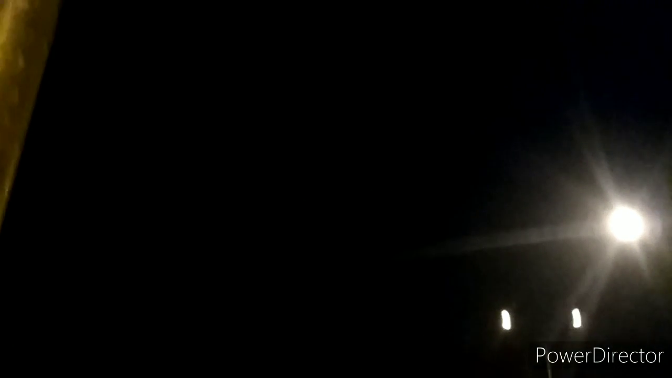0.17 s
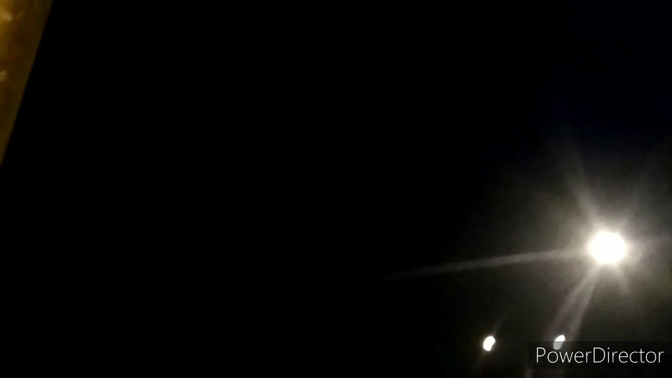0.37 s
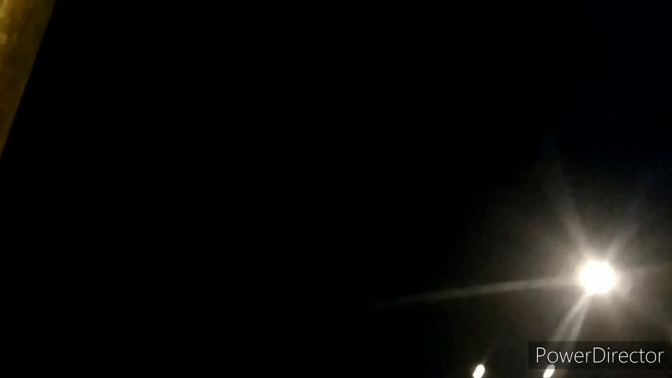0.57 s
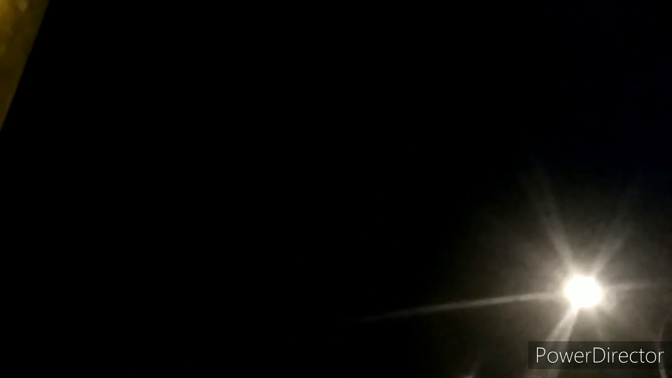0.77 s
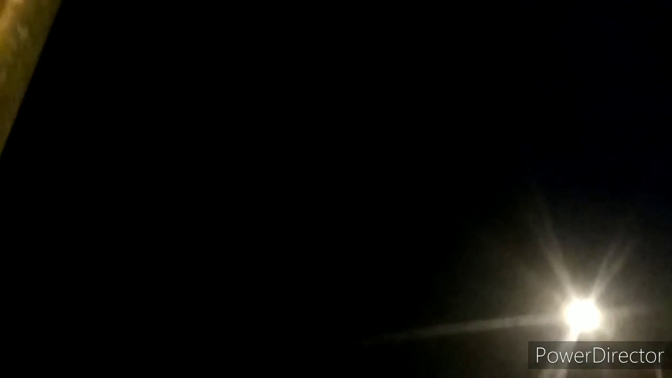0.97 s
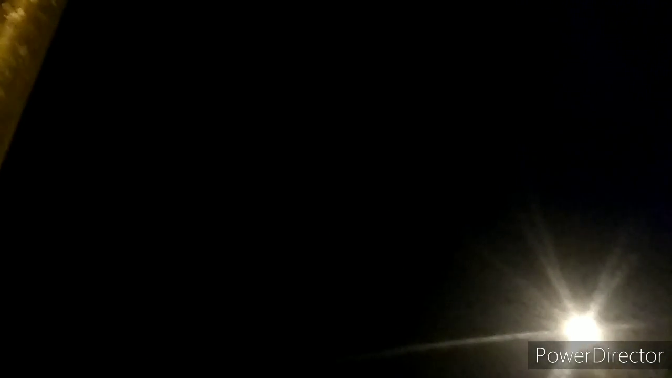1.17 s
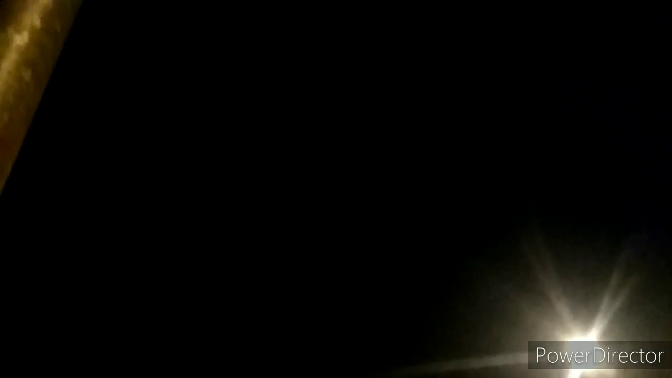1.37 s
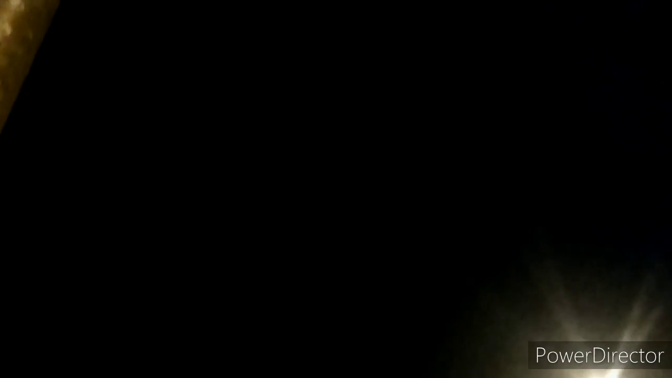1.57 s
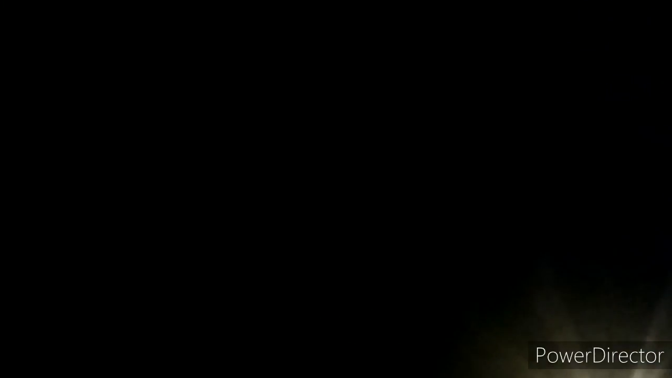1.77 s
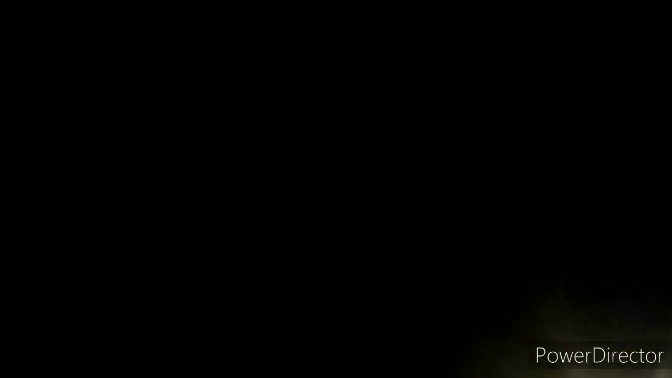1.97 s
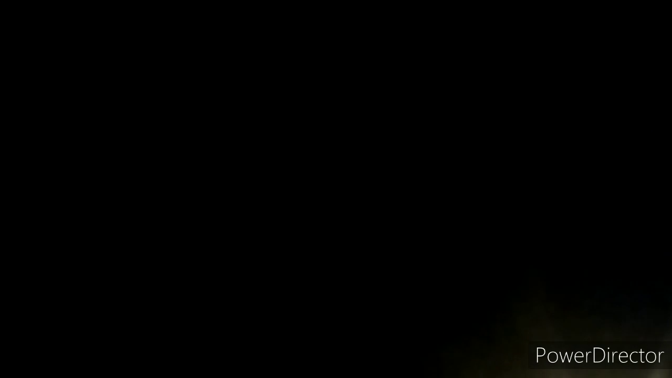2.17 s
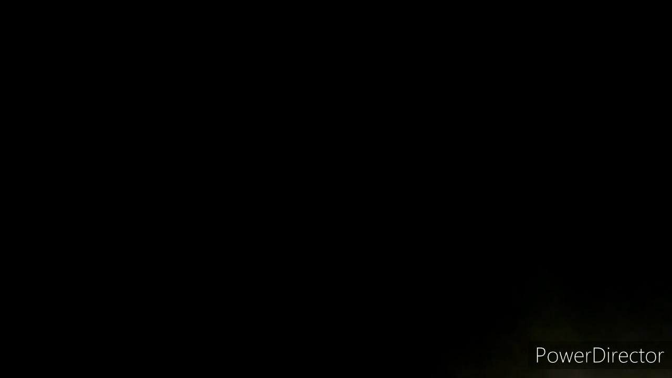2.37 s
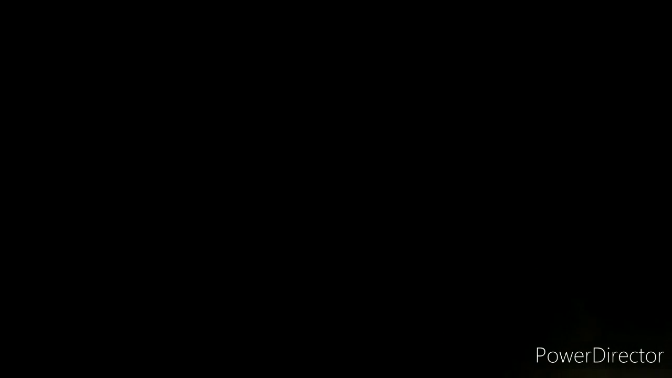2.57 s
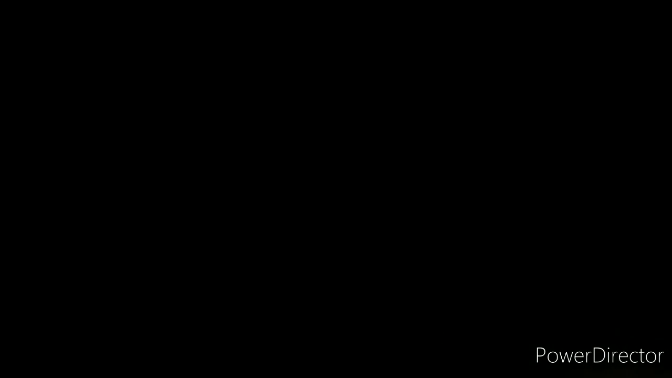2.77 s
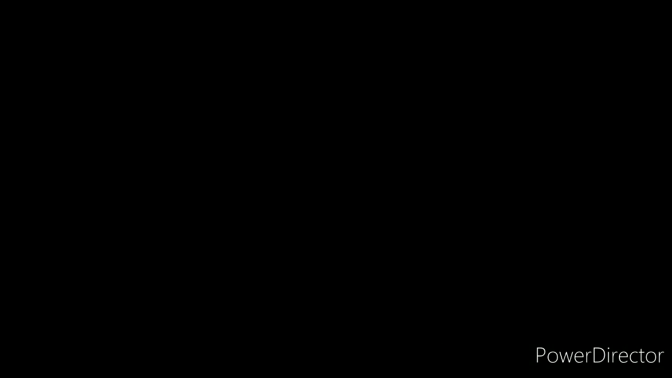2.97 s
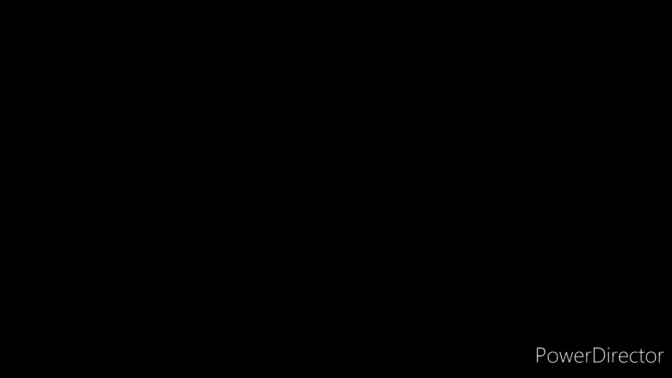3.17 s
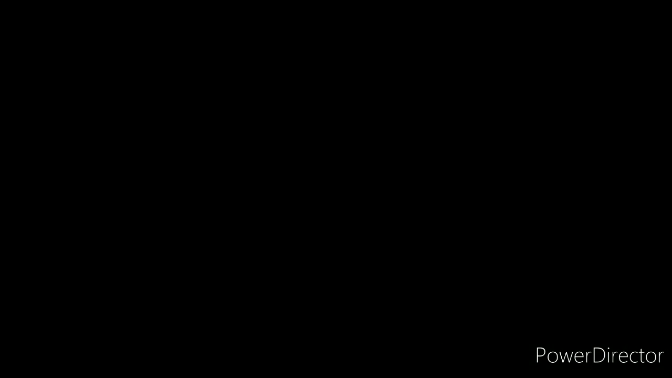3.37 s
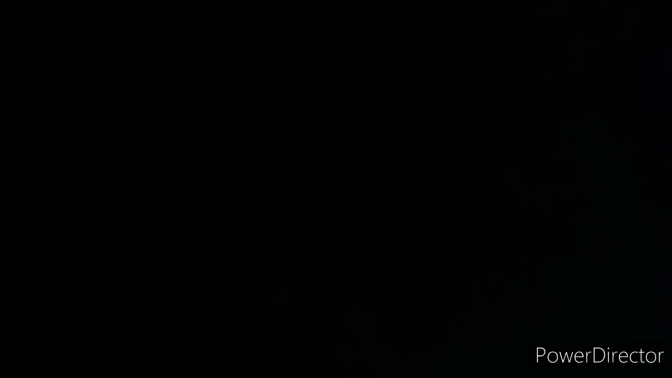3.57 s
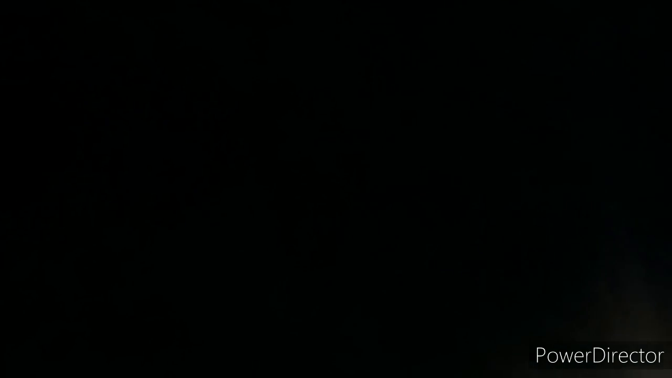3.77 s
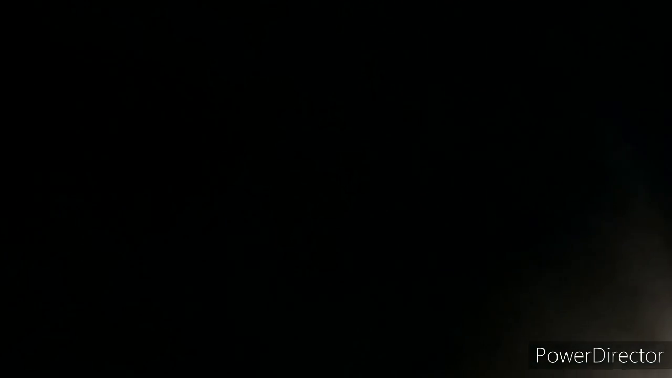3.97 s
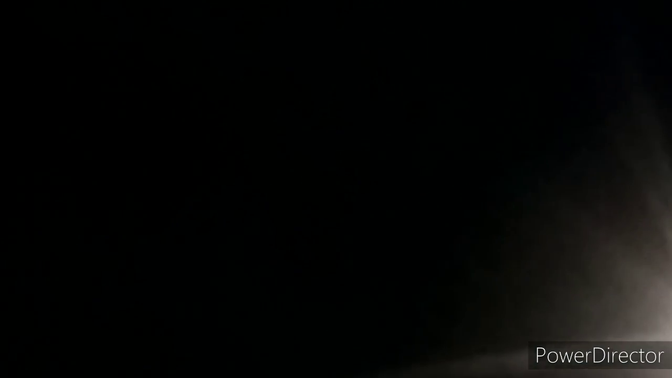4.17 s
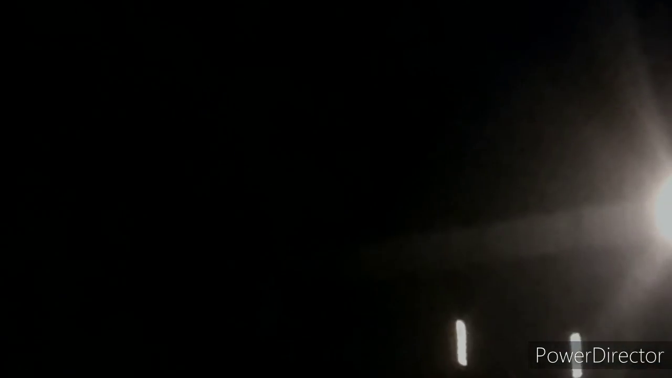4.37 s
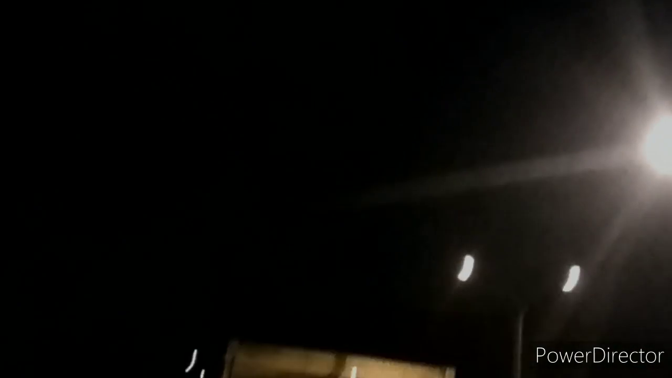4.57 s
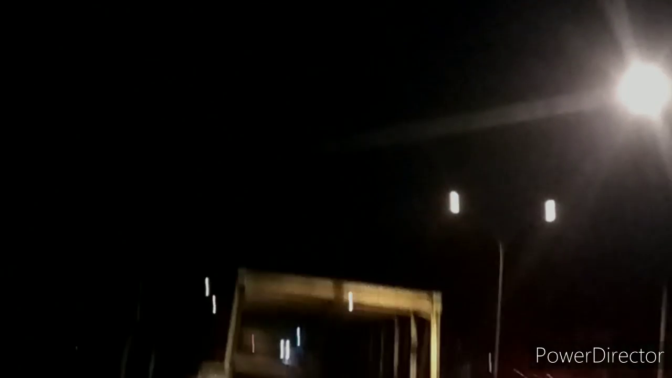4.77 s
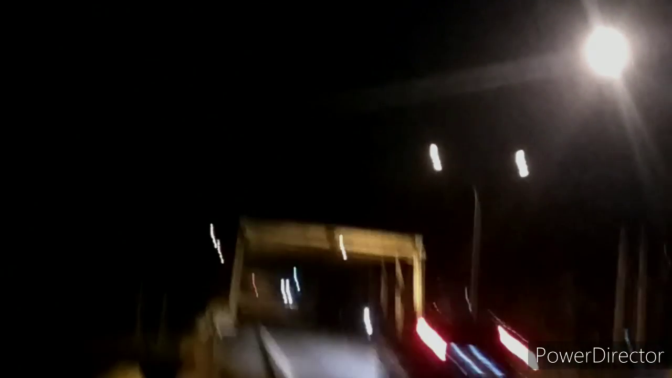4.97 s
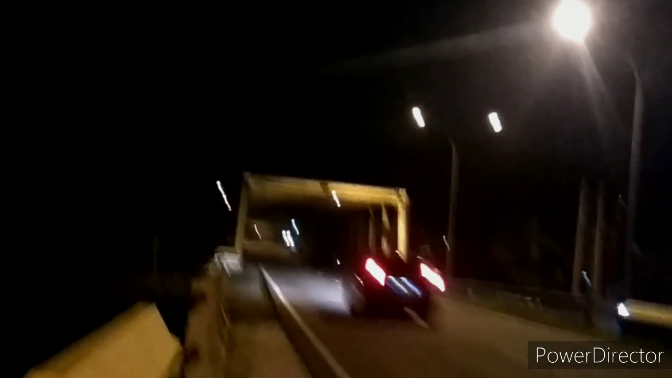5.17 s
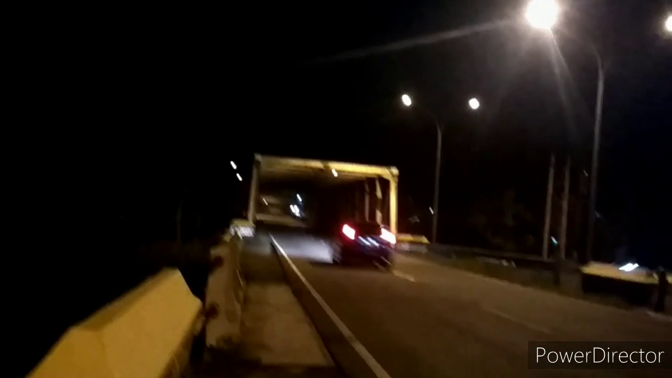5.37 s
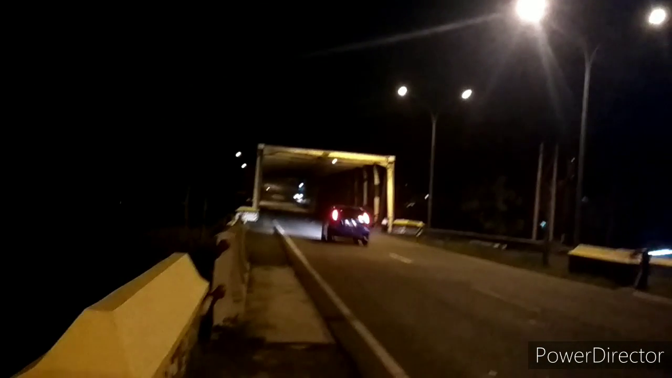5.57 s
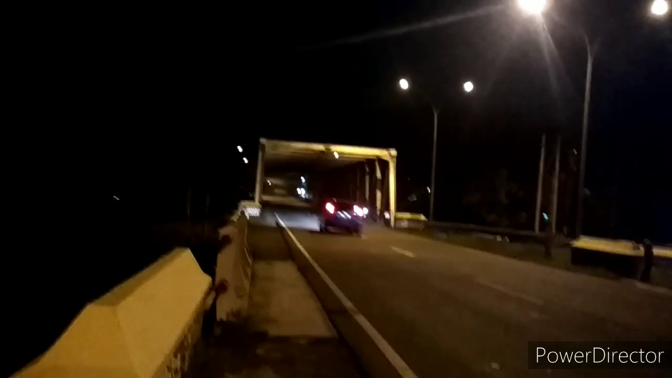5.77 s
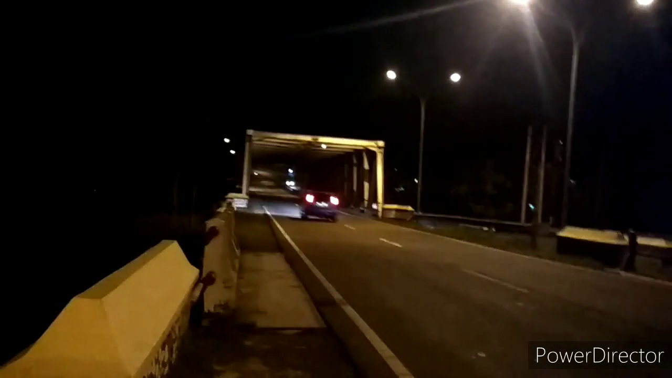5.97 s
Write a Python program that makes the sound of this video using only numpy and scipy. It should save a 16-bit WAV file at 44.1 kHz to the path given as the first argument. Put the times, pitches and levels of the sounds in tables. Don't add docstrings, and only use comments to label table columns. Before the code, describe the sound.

Close to a bridge road at night, a slow diesel lorry swells quickly, its deep throbbing exhaust peaking with airy hiss and a thin brake squeal. It drops away to a puff of air and sharp valve ticking. After a tiny silent gap, a car sweeps by with a humming engine and roaring tyres, slapping over joints, while a cricket chirps steadily. Handheld outdoor microphone, bassy, slightly rough and patchy in the treble.

```python
import sys
import numpy as np
from scipy import signal
from scipy.fft import rfft, irfft, next_fast_len
from scipy.io import wavfile
from scipy.ndimage import uniform_filter1d, map_coordinates

SR = 44100
rng = np.random.default_rng(int(sys.argv[2]) if len(sys.argv) > 2 else 0)


def convert_level_to_amplitude(level_db):
    exponent = np.asarray(level_db, float) / 20
    return 10 ** exponent


def pcm_store(signal):
    levels = np.round(np.clip(np.atleast_2d(signal), -1, 1) * 32767)
    wavfile.write(sys.argv[1], SR, levels.astype(np.int16).T)


N = 265923
TIME = np.arange(N) / SR

CUT = 3.524, 3.549
# strength/dB, lateness/s, valve tick/dB
CYLINDERS = [
    (0, 0, 0),
    (0, 0, -8),
    (-4, .002, -9),
]
# t/s, peak level/dB
TICKS = [(0, -53), (2.7, -45), (2.95, -24.5), (3.2, -19.5), (3.53, -18)]
NEAREST_DB = -19


def unit(x):
    return x / np.sqrt(np.mean(x ** 2) + 1e-20)


def along(points, hz):
    f, v = np.transpose(points)
    return np.interp(np.log(hz + 1), np.log(f + 1), v)


def curves(rows):
    s, *cols = np.transpose(rows)
    return [np.interp(TIME, s, c) for c in cols]


def wobble(rate):
    coarse = np.arange(0, N + 64, 64) / SR
    knots = rng.standard_normal(int(N * rate / SR) + 5)
    return np.interp(TIME, coarse, map_coordinates(knots, [coarse * rate]))


def filtered(x, response):
    m = next_fast_len(N + 8192)
    return irfft(rfft(x, m) * response(np.fft.rfftfreq(m, 1 / SR)), m)[..., :N]


def delayed(x, samples, order=3):
    return map_coordinates(x, [np.arange(N) - samples], order=order, mode="nearest")


def modes(table):
    def response(f):
        total = 0
        for k, (centre, width, db) in enumerate(table):
            damping = 1j * f * width
            total = total + (-1) ** k * convert_level_to_amplitude(db) * damping / (centre * centre - f * f + damping)
        return total
    return response


def rush(spectrum, patchy_db=None):
    pair = rng.standard_normal((2, N))
    if patchy_db is not None:
        z = signal.stft(pair, nperseg=512)[2]
        field = uniform_filter1d(rng.standard_normal(z.shape[1:]), size=7, axis=0)
        field = uniform_filter1d(field, size=10, axis=1)
        pair = signal.istft(z * convert_level_to_amplitude(patchy_db * unit(field)), nperseg=512)[1][:, :N]
    return unit(filtered(pair, lambda hz: convert_level_to_amplitude(along(spectrum, hz))))


def scattered(x):
    t = TIME[:SR // 8]
    tail = rng.standard_normal(len(t)) * convert_level_to_amplitude(-60 * t / 0.091)
    return np.array([x, signal.fftconvolve(x, tail / np.linalg.norm(tail))[:N]])


def passing(top_db, closest, coming, going):
    away = (TIME - closest) / np.where(TIME < closest, coming, going)
    return top_db - 10 * np.log10(1 + away ** 2)


def summed(*levels_db):
    return np.sqrt(sum(convert_level_to_amplitude(db) ** 2 for db in levels_db))


def firings(anchor, column_db, scatter_db):
    # t/s, firing rate/Hz
    lorry_rate = [(0.4, 33.2), (0.7, 32.7), (1.05, 31.9), (1.3, 30.9), (1.6, 29.95), (1.9, 29.4),
                  (2.2, 29.1), (2.9, 28.9), (3.53, 28.75)]
    turns = np.cumsum(curves(lorry_rate)[0]) / SR
    turns -= np.interp(anchor, TIME, turns)
    k = np.arange(np.ceil(turns[0]), turns[-1] - 1).astype(int)
    cylinder = k % len(CYLINDERS)
    luck = rng.standard_normal((len(k), 2))
    late = np.transpose(CYLINDERS)[1][cylinder] + .0003 * luck[:, 0]
    where = np.clip((np.interp(k, turns, TIME) + late) * SR, 0, N - 1).astype(int)
    return np.bincount(where, convert_level_to_amplitude(column_db[cylinder] + scatter_db * luck[:, 1]), N)


def lorry_engine():
    # t/s, level/dB
    tailpipe = [(0, -65), (.5, -50), (.7, -45), (.78, -30), (.88, -19.5), (1.18, -13.5), (1.5, -14.5),
                (1.78, -21), (1.9, -23), (1.945, -33), (1.99, -26), (2.07, -23), (2.2, -26.5), (2.4, -39.5),
                (2.48, -34), (2.65, -37), (3.1, -43), (3.53, -36.5)]
    # t/s, share
    rough = [(0, .8), (.75, .4), (1, .2), (1.45, .17), (1.75, .32), (2.05, .6), (2.7, 1.1), (3.53, 1.1)]
    # t/s, half length/s, level/dB
    surges = [
        (2.698, 0.0134, 9.5),
        (2.805, 0.026, 10),
        (3.112, 0.014, 5),
        (3.325, 0.0225, 5),
        (3.445, 0.025, 15),
        (3.497, 0.0093, 5),
    ]
    # f/Hz, width/Hz, level/dB
    thump = [
        (62, 30, -11),
        (108, 50, 0),
        (33, 18, -14),
    ]
    boom = [
        (158, 38, 0),
    ]
    body = [
        (192, 45, 0),
    ]
    bark = [
        (315, 80, 0),
    ]
    # over tailpipe/dB, steepness, near engine side/dB, near steepness, share of surge
    pipe_parts = [
        (-2, 1.14, -53, 0.145, .8),
        (.5, 0.99, -61.5, 0.15, 0.34),
        (-9, .85, -34.5, 0.43, 0.919),
        (-9.5, 1.57, -32, 0.823, .7),
    ]
    arrival = [
        -.003,
        .003,
        .005,
        0.0089,
    ]
    loudest_db, first_firing, first_tick = -15, 1.135, 3.213

    def pipe(table):
        ring = modes(table)
        return lambda hz: ring(hz) * np.abs(ring(hz))

    strength_db, _, tick_db = np.transpose(CYLINDERS)
    exhaust = np.zeros(N)
    tail_db = curves(tailpipe)[0] - loudest_db
    side_db = curves(TICKS)[0] - NEAREST_DB
    surge_db = sum(db * np.exp(-((TIME - s) / half) ** 2) for s, half, db in surges)
    for part, table, late in zip(pipe_parts, [thump, boom, body, bark], arrival):
        over_db, steep, near_db, grows, share = part
        gain = summed(loudest_db + over_db + steep * tail_db, near_db + grows * side_db)
        gain = gain * convert_level_to_amplitude(share * surge_db)
        puffs = unit(firings(first_firing + late, strength_db, scatter_db=2.0))
        puffs = puffs + curves(rough)[0] * rng.standard_normal(N)
        exhaust -= gain * unit(filtered(puffs, pipe(table)))
    exhaust = filtered(exhaust, lambda hz: 1 / (1 + (hz / 410) ** 14))
    t = TIME[:300]
    click = np.sin(2 * np.pi * 9100 * t) * convert_level_to_amplitude(-60 * t / 0.011)
    click = click * (1 + .9 * rng.standard_normal(len(t)))
    ticks = signal.fftconvolve(firings(first_tick, tick_db, scatter_db=2.5), click)[:N]
    return scattered(exhaust) + convert_level_to_amplitude(curves(TICKS)[0] + 3.5) * ticks * [[1], [-.3]]


def lorry_road():
    # far level/dB, top level/dB, closest/s, coming/s, going/s
    layers = [
        (-46, -31.5, 1.267, 0.173, 0.24),
        (-38, -28, 1.175, 0.096, 0.4),
        (-51, -37, 1.16, 0.24, 0.51),
        (-55, -26.5, 1.324, 0.28, 0.59),
    ]
    engine_side_db = [
        -34.5,
        -33.5,
        -52,
        -39,
    ]
    valve_puff_db = [
        -60,
        -50,
        -38,
        -26,
    ]
    # t/s, delay/ms, share
    ground = [(0, 1.88, 0.96), (1, 1.822, 0.17), (1.4, 1.87, 0.184), (2, 1.79, 0.25), (2.8, 1.69, 0.67),
              (3.53, 1.702, 0.87)]
    # f/Hz, level per Hz/dB
    casing_colour = [(430, -37.5), (560, -9.5), (680, -2), (950, -1.5), (1100, -3.5), (1300, -29.5)]
    tread_colour = [(950, -48), (1150, -8.5), (1350, -2.5), (2000, -4.5), (2900, -9.5), (3400, -16.5),
                    (3700, -29), (4200, -51)]
    whirr_colour = [(2240, -28), (3800, 9), (4380, 1.5), (5040, -1.5), (5540, 1.5), (6460, 1), (8200, -3),
                    (10700, -51), (18000, -120)]
    air_colour = [(4350, -29.5), (7400, -5), (8610, -5), (9770, -0.5), (13100, 2.5), (14900, -3),
                  (15600, 4.5), (16000, -42)]
    traffic_colour = [(12, -38), (28, -3.5), (64, 3.5), (203, -6), (340, -20), (392, -9.5), (471, -14.5),
                      (600, -17), (780, -17), (1320, -120)]
    puff_s, puff_rise_s, puff_fall_s = 2.64, .04, .1

    side_db = 0.63 * (curves(TICKS)[0] - NEAREST_DB)
    puff_db = -np.abs(TIME - puff_s) * 9 / np.where(TIME < puff_s, puff_rise_s, puff_fall_s)
    gains = []
    for (far_db, *pass_by), near_db, top_db in zip(layers, engine_side_db, valve_puff_db):
        gains.append(summed(far_db, passing(*pass_by), near_db + side_db, top_db + puff_db))
    casing, tread, fan, leak = gains
    delay_ms, share = curves(ground)
    gust = wobble(8.949)
    tyres = casing * rush(casing_colour, patchy_db=2.5) + tread * rush(tread_colour, patchy_db=1.0)
    echo = [delayed(uniform_filter1d(x, size=13), delay_ms * SR / 1000, order=1) for x in tyres]
    tyres = tyres - share * np.array(echo)
    whirr = fan * convert_level_to_amplitude(4.2 * gust) * rush(whirr_colour)
    flutter_db = 0.5 * wobble(5) + 0.9 * gust + 1.1 * wobble(18)
    air = leak * convert_level_to_amplitude(flutter_db) * rush(air_colour, patchy_db=1.5)
    return convert_level_to_amplitude(0.48 * gust) * tyres + whirr + air + convert_level_to_amplitude(-46.0) * rush(traffic_colour)


def brakes():
    # start/s, end/s, f/Hz, level/dB
    squeals = [
        (.86, 1.03, 3018, -38),
        (.88, 1.0, 3440, -55),
        (1.0, 1.18, 3018, -51),
        (.06, .27, 5620, -52),
        (.29, .36, 5620, -51),
    ]
    out = np.zeros(N)
    for start, end, hz, db in squeals:
        rise = np.clip((TIME - start) / 0.0071, 0, 1)
        fall = np.clip((end - TIME) / (0.51 * (end - start)), 0, 1)
        tone = np.sin(2 * np.pi * hz * TIME + 0.4 * wobble(41))
        out += convert_level_to_amplitude(db + 9 + 1.2 * wobble(29)) * rise * fall * tone
    return out * [[1], [-.7]]


def far_drone():
    swell_db = 3 * passing(0, closest=.6, coming=.07, going=.035)
    gain = summed(-32 + swell_db, -50) * (TIME < .75)
    hum = gain * convert_level_to_amplitude(2 * wobble(25)) * np.sin(2 * np.pi * 198 * TIME + .6 * wobble(30))
    return hum * [[1], [0]]


def car_engine():
    # t/s, firing rate/Hz
    car_rate = [(3.56, 64.2), (3.7, 60.5), (4.07, 61.1), (4.35, 59.4), (4.7, 59.3), (5.05, 59.2), (5.4, 60),
                (6.03, 58.56)]
    strong_orders = [2, 4, 5, 6]
    # top level/dB, loudest/s, coming/s, going/s
    order_passes = [
        (-22, 4.23, .25, 0.837),
        (-20, 4.13, 0.084, 0.128),
        (-25.5, 4.966, 0.46, 0.63),
        (-22, 4.56, .3, 0.32),
    ]
    # multiple of the firing rate, level against order 2/dB
    weak_orders = [(1, -8.5), (1.5, -5.5), (3, -1.5), (3.5, -8.5), (7, -10.5), (8, -12.5)]
    rate, = curves(car_rate)
    strong_db = [passing(*pass_by) for pass_by in order_passes]
    turn = 2 * np.pi * np.cumsum(rate) / SR
    out = np.zeros(N)
    for k, db in zip(strong_orders, strong_db):
        out += convert_level_to_amplitude(db + 2 + 1.8 * wobble(10)) * np.cos(k * turn + .4 * wobble(9))
    for k, db in weak_orders:
        out += convert_level_to_amplitude(strong_db[0] + db + 1.5 * wobble(6)) * np.cos(k * turn + 0.984 * wobble(6))
    return scattered(out)


def car_road():
    # top level/dB, loudest/s, coming/s, going/s
    passes = [
        (-19.5, 4.07, 0.39, 0.94),
        (-20.5, 4.32, 0.234, 0.27),
        (-19.5, 4.625, 0.42, 0.46),
        (-28, 4.437, 0.31, 0.49),
        (-29.5, 4.48, 0.16, .12),
    ]
    swells_db = [
        .8,
        .8,
        .5,
        .6,
    ]
    # f/Hz, level per Hz/dB
    rumble = [(8.8, -50), (15, -16.5), (112, -0.5), (183, -1), (226, -5), (296, -0.5), (401, -7),
              (560, -17), (730, -39), (1230, -120)]
    boom = [(380, -26), (460, -1), (700, -3), (950, -6), (1150, -41)]
    roar = [(530, -56), (900, -17), (1020, 0), (1210, 2), (1320, -1.5), (1610, -2.5), (2600, -18),
            (3380, -63), (5720, -120)]
    hiss = [(1240, -49.5), (2100, -5), (2600, -11), (3740, -13), (4210, -13), (4630, -14), (7320, -17),
            (8250, -17.5), (9370, -14), (10700, -12.5), (14800, -18), (16000, -23)]
    wash = [(1300, -29.5), (1700, 2.5), (2700, -0.5), (3400, -15.5), (3900, -40)]
    # t/s, peak level/dB, f/Hz
    joints = [
        (5.0519, -4, 1570),
        (5.0809, -4, 1310),
        (5.1851, -10, 1130),
        (5.2131, -5.5, 1580),
    ]
    gust = wobble(18)
    out = np.zeros((2, N))
    for pass_by, swell_db, colour in zip(passes, [*swells_db, .6], [rumble, boom, roar, hiss, wash]):
        level_db = passing(*pass_by) + swell_db * wobble(8) + 0.5 * gust + 0.4 * wobble(30)
        out += convert_level_to_amplitude(level_db) * rush(colour, patchy_db=1.0)
    slaps, t = np.zeros(N), TIME[:600]
    for s, db, hz in joints:
        slaps[round(s * SR):][:len(t)] += convert_level_to_amplitude(db + 4 - 60 * t / .006) * np.sin(2 * np.pi * hz * t)
    return out + scattered(slaps)


def cricket():
    # t/s, peak level/dB
    chirps = [(3.6551, -45), (3.8202, -43.5), (3.963, -41.5), (4.1391, -47), (4.3098, -50), (4.4573, -43),
              (4.6044, -42.5), (4.7536, -43.5), (4.9087, -50), (5.0695, -48), (5.2244, -40), (5.3848, -39),
              (5.5343, -41), (5.6848, -42.5), (5.839, -42), (5.9958, -43)]
    out, t = np.zeros(N + SR), TIME[:SR // 40]
    strokes = np.maximum(np.sin(2 * np.pi * 260 * t), 0) ** 0.5
    strokes = strokes * np.sqrt(t / t[-1]) * (t < .021)
    for s, db in chirps:
        tone = np.sin(2 * np.pi * rng.normal(7624, 64) * t)
        out[round(s * SR):][:len(t)] += convert_level_to_amplitude(db + 14.5) * strokes * tone
    out = out[:N] + 0.545 * np.roll(out[:N], 1000)
    return np.array([out, -.4 * out])


def two_ports(pair):
    # t/s, lead/samples
    left_lead = [(0, 3), (.8, 3), (1, 16), (1.45, 16), (1.65, 4), (2.85, 2), (3.1, 17), (4.55, 18),
                 (4.7, 8), (5.1, 4), (6.03, 1)]
    # f/Hz, likeness
    alike = [(60, .997), (200, .99), (500, .92), (1000, .8), (1800, .58), (3000, .36), (5000, .22),
             (15000, .15)]
    # f/Hz, level/dB
    tilt = [(60, 0), (130, -.5), (300, -.3), (700, 0), (1400, 0), (2800, -1.5), (5500, -2.5), (9000, -5.5),
            (14000, 1)]

    def shares(hz):
        angle = np.arccos(np.clip(along(alike, hz), 0, 1)) / 2
        return np.array([np.cos(angle), np.sin(angle)])

    direct, spread = filtered(pair, shares)
    lead = curves(left_lead)[0] / 2
    ports = np.array([delayed(direct + spread, -lead), delayed(direct - spread, lead)])
    return filtered(convert_level_to_amplitude(1.0) * ports, lambda hz: convert_level_to_amplitude(along(tilt, hz) * [[.5], [-.5]]))


def scene():
    before = np.clip((CUT[0] - TIME) / .002, 0, 1)
    after = np.clip((TIME - CUT[1]) / .02, 0, 1)
    after = after * convert_level_to_amplitude(-11 * np.exp(-np.abs(TIME - CUT[1]) / 0.11))
    lorry = lorry_engine() + lorry_road() + brakes() + far_drone()
    car = car_engine() + car_road() + cricket()
    return two_ports(before * lorry + after * car)


def treble_gaps(x):
    # f/Hz, share of time with the lorry, share of time with the car
    gaps = [(2700, 0, 0), (3200, 0, .15), (3500, .45, .2), (3750, .7, .25), (4200, .2, .14),
            (4600, .75, .12), (5150, .95, .12), (5450, .05, .22), (5800, .05, .3), (6500, .25, .3),
            (7400, .1, .06), (8400, .18, .3), (10000, .05, .03), (13500, .1, .2), (15200, .06, .35),
            (15800, .6, .9)]
    hz, t, z = signal.stft(x, SR, nperseg=1024)
    luck = uniform_filter1d(rng.standard_normal((103, len(t))), size=5, axis=1)
    rank = (luck.ravel().argsort().argsort() / luck.size).reshape(luck.shape)
    rank = rank.repeat(5, axis=0)[:len(hz)]
    f, first, second = np.transpose(gaps)
    share = np.where(t < CUT[1], np.interp(hz, f, first)[:, None], np.interp(hz, f, second)[:, None])
    share = share * (1 - .4 * np.exp(-((t - 1.2) / .25) ** 2))
    heard = (rank >= share) * (hz < 15850)[:, None]
    return signal.istft(z * heard, SR, nperseg=1024)[1][:, :N]


def low_pass(x):
    return signal.sosfilt(signal.butter(12, 16740, fs=SR, output="sos"), x)


def record(dry):
    top = dry / (1 + np.abs(dry) ** 8) ** (1 / 8)
    mix = treble_gaps(top) * ((TIME < CUT[0]) | (TIME > CUT[1]))
    return low_pass(mix)


dry = scene()
out = record(dry)
pcm_store(out)
```